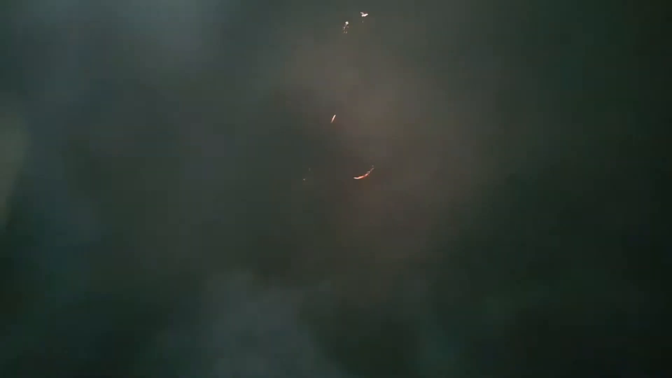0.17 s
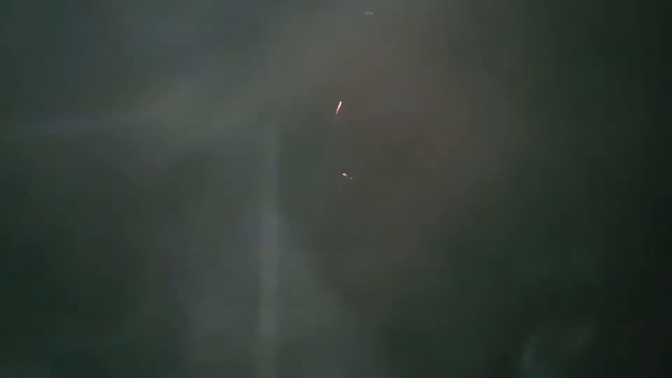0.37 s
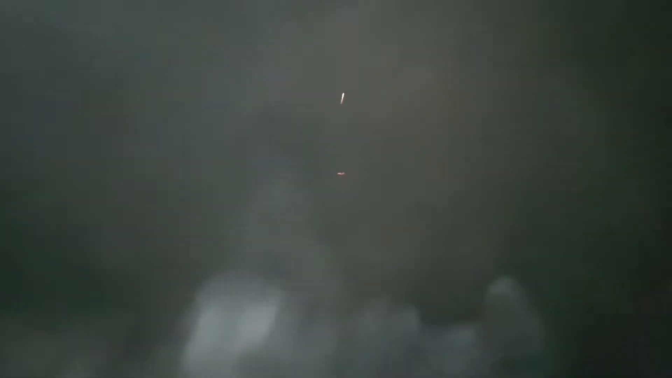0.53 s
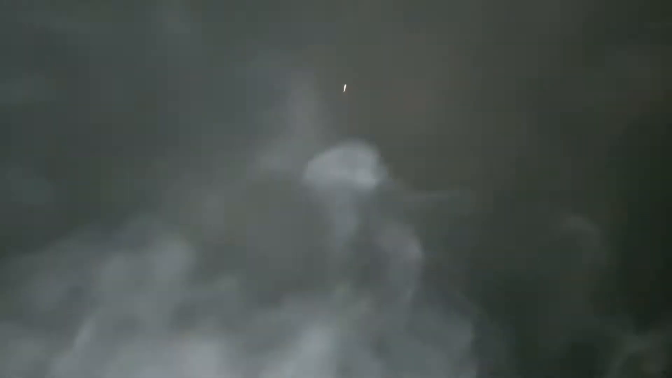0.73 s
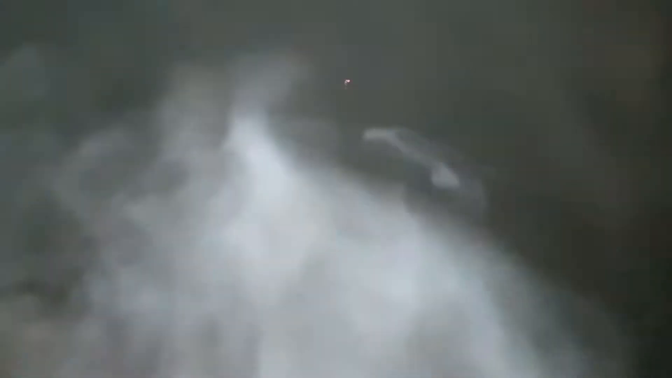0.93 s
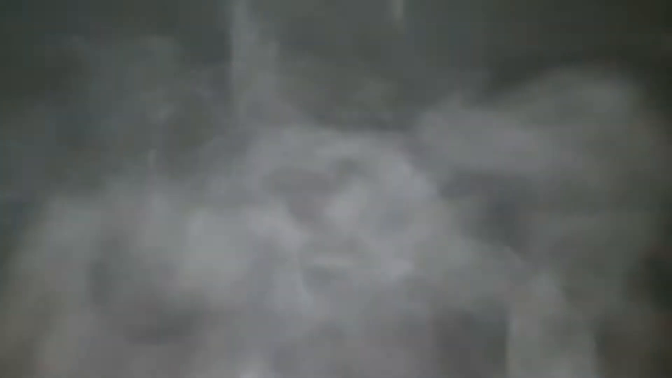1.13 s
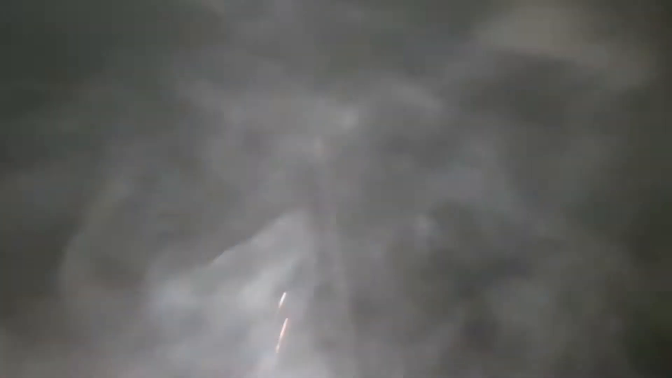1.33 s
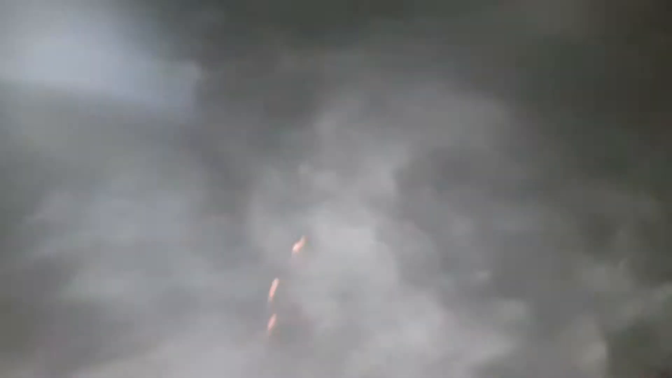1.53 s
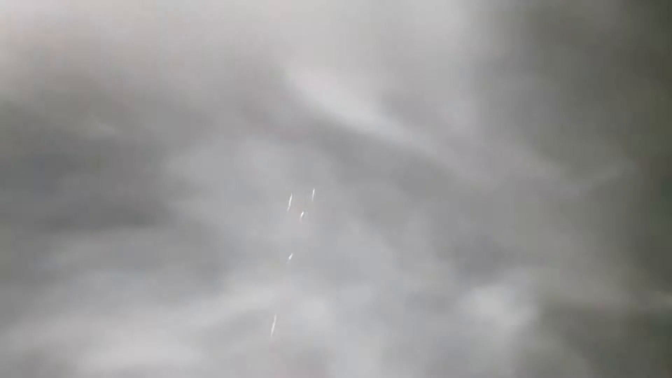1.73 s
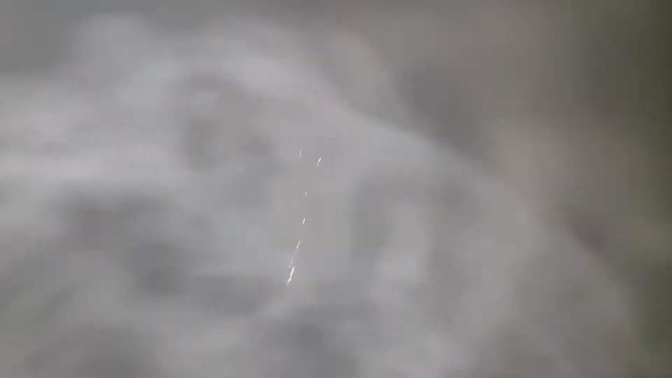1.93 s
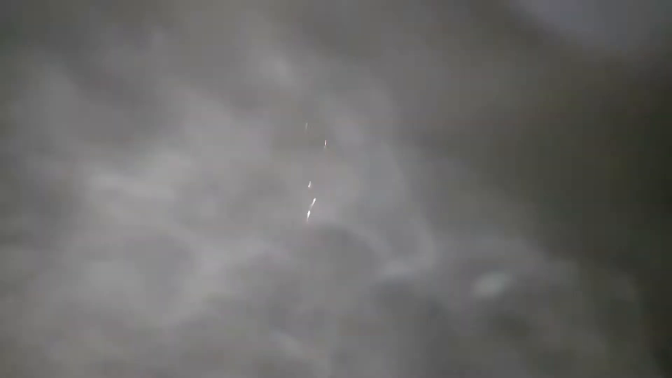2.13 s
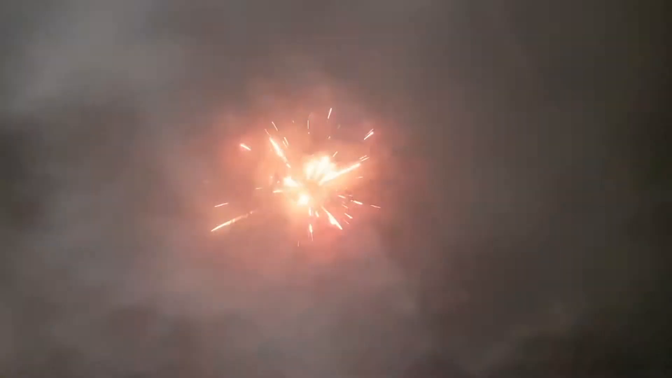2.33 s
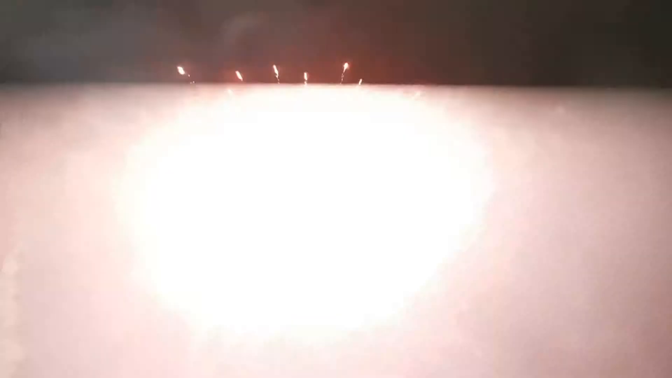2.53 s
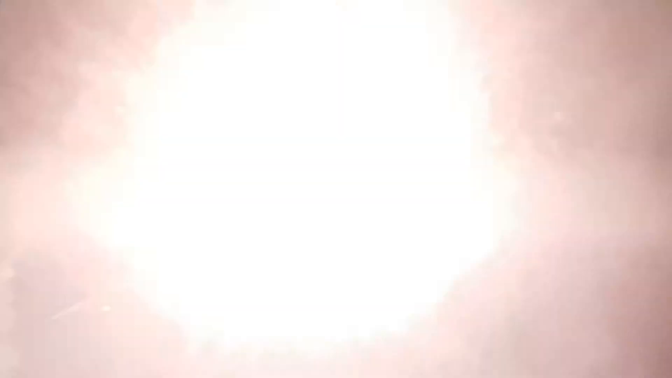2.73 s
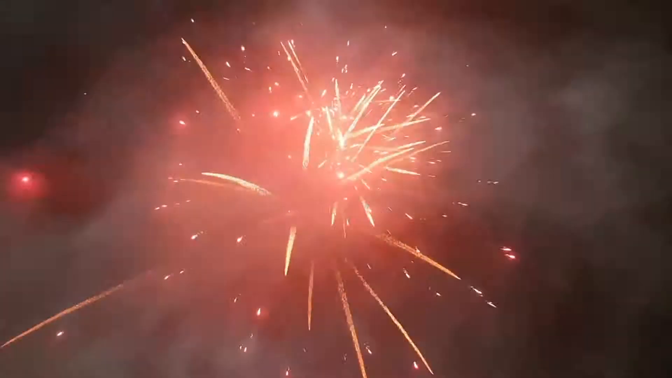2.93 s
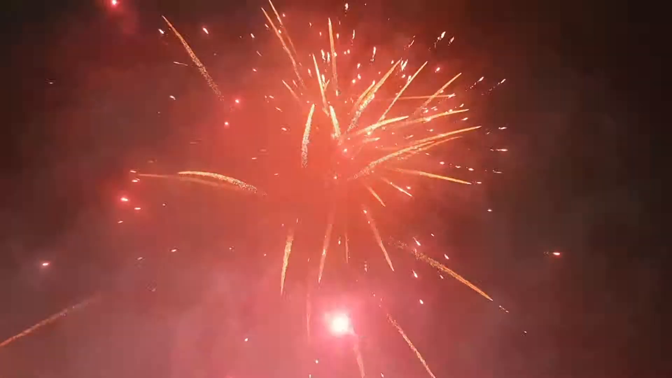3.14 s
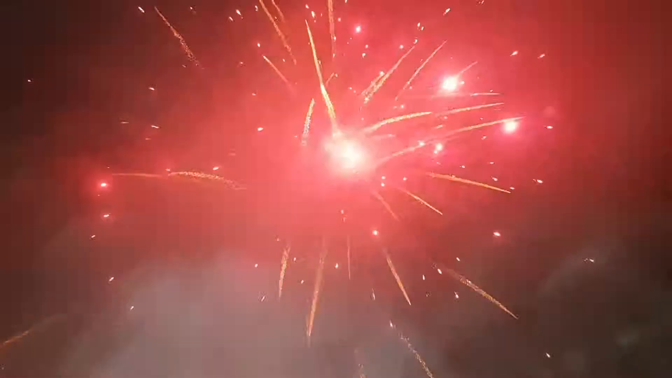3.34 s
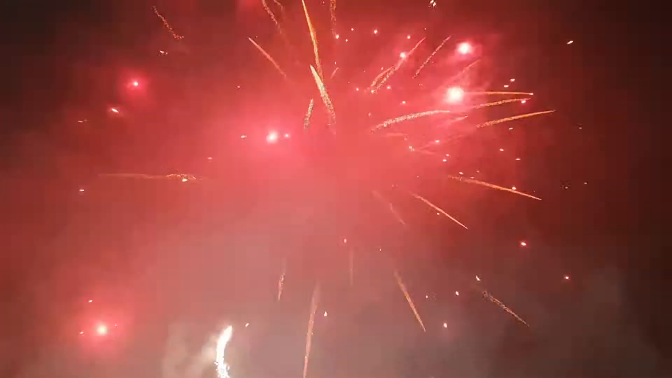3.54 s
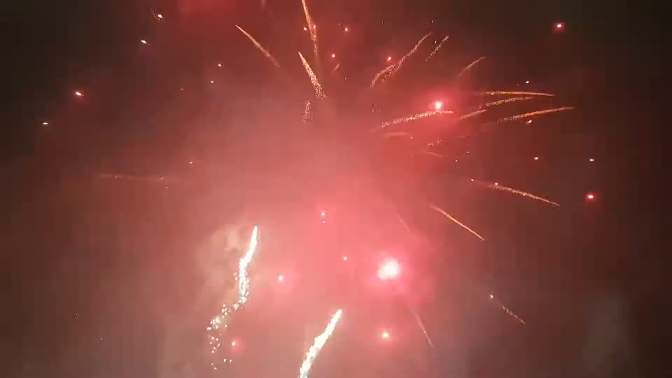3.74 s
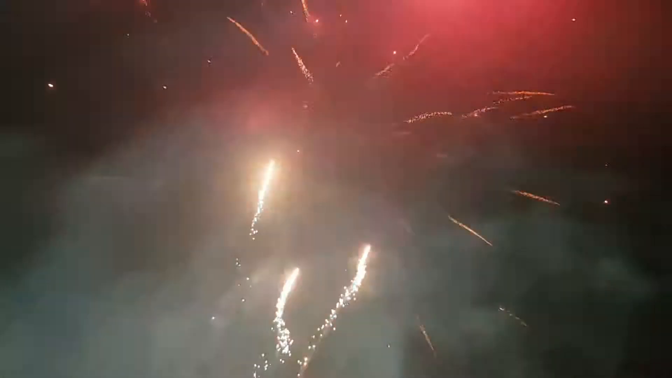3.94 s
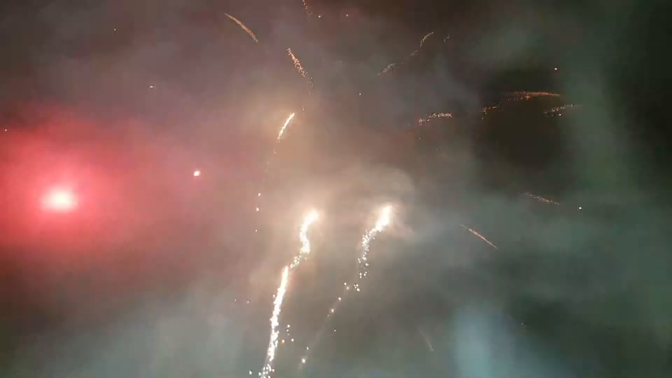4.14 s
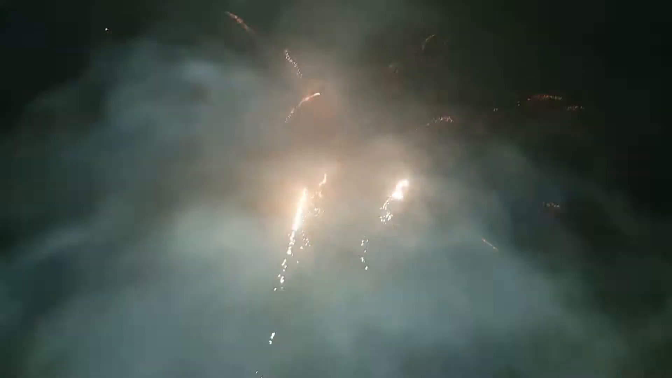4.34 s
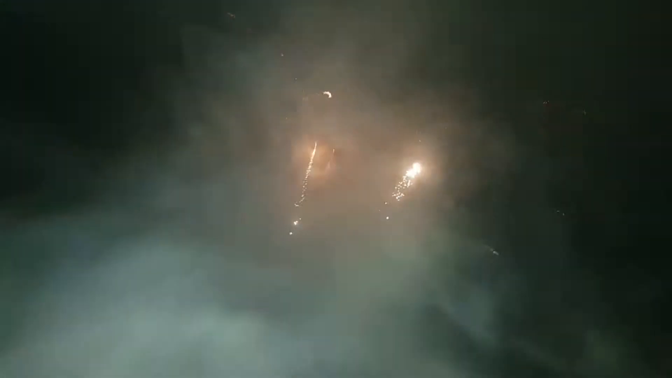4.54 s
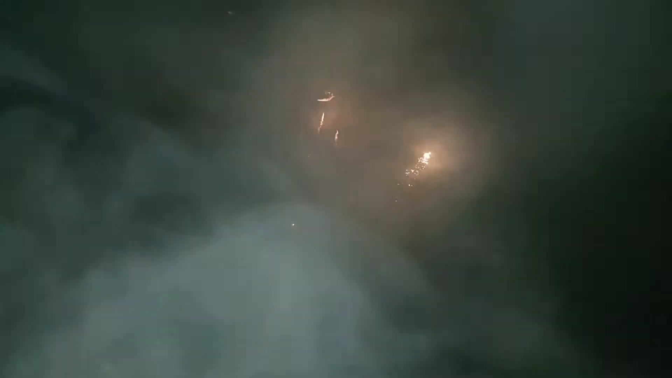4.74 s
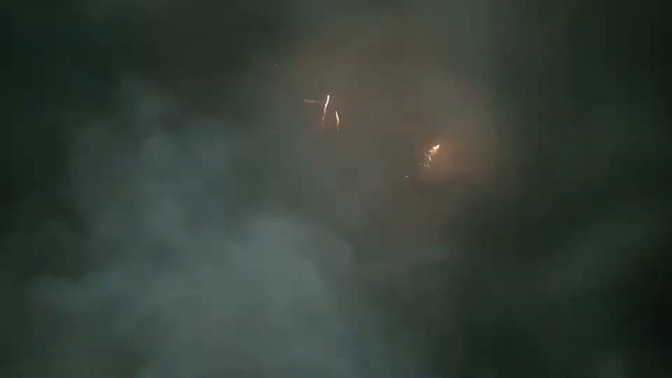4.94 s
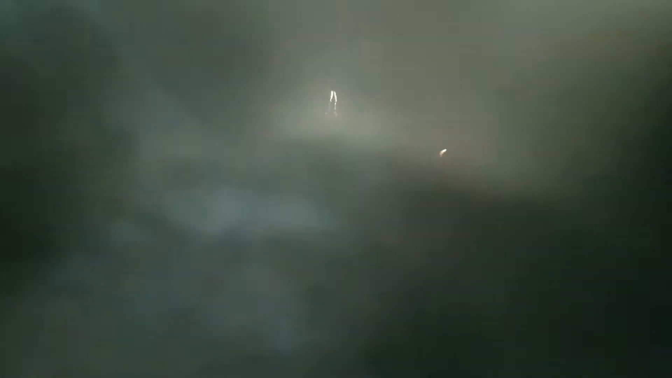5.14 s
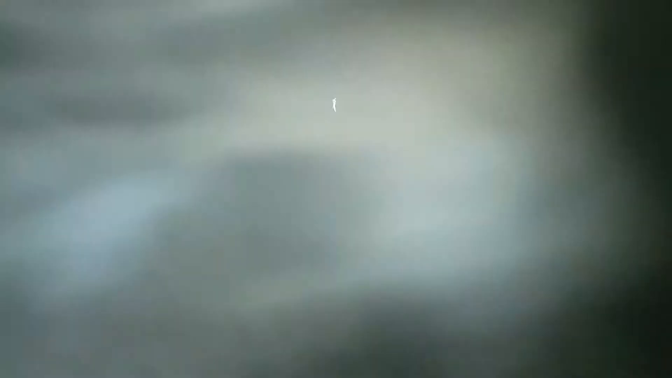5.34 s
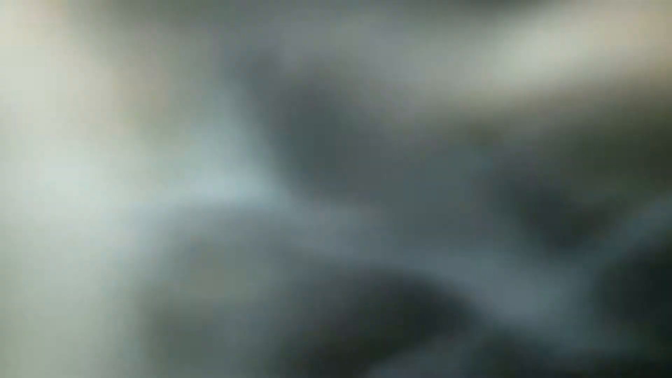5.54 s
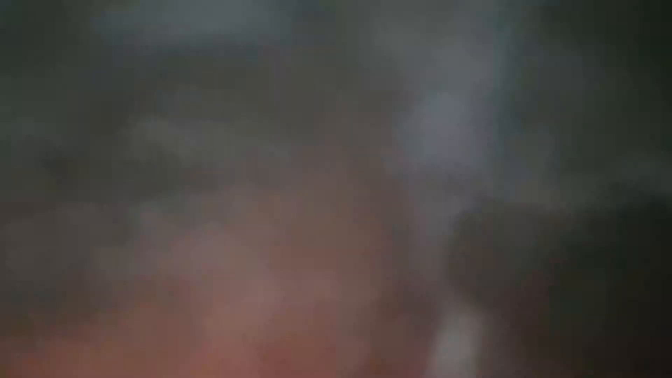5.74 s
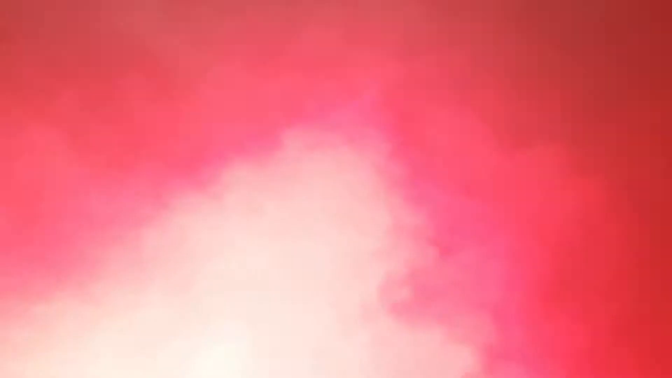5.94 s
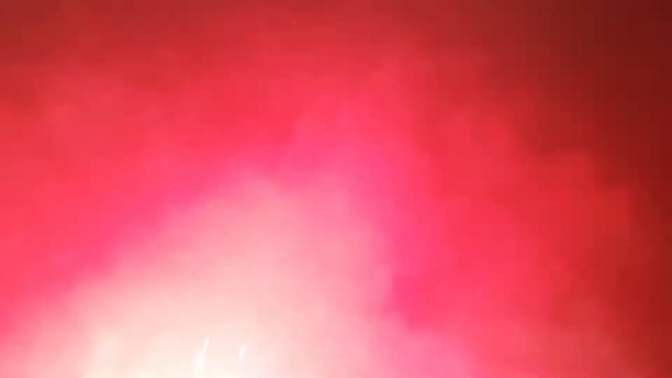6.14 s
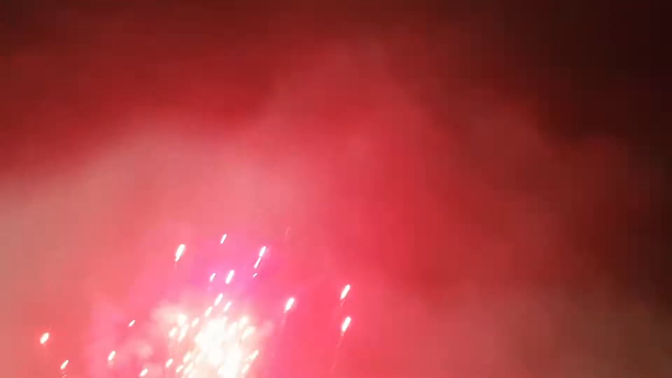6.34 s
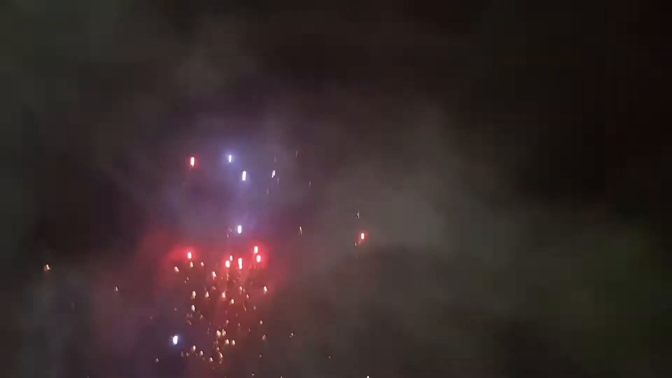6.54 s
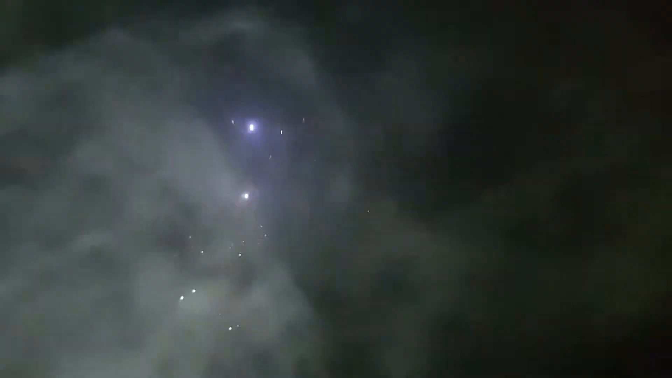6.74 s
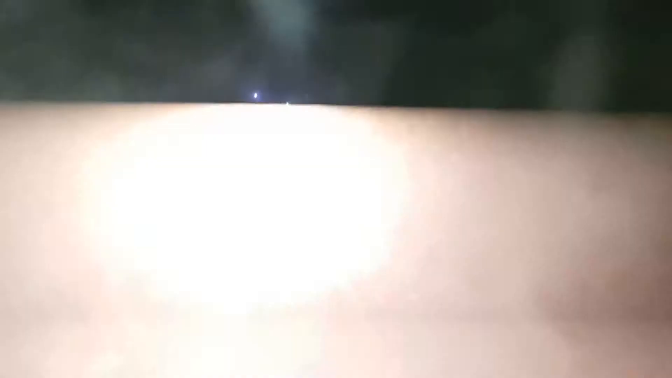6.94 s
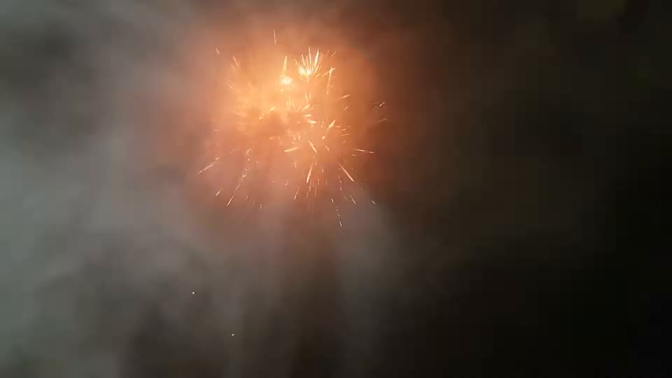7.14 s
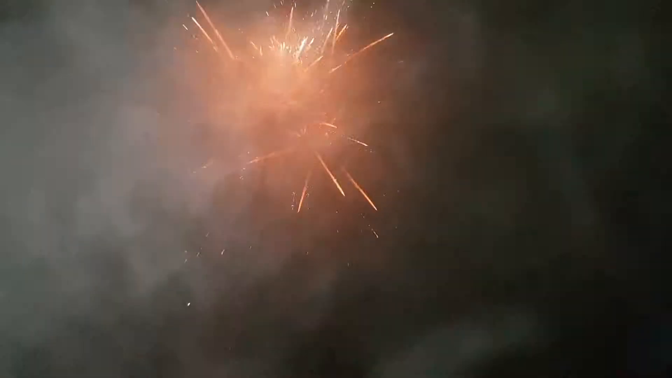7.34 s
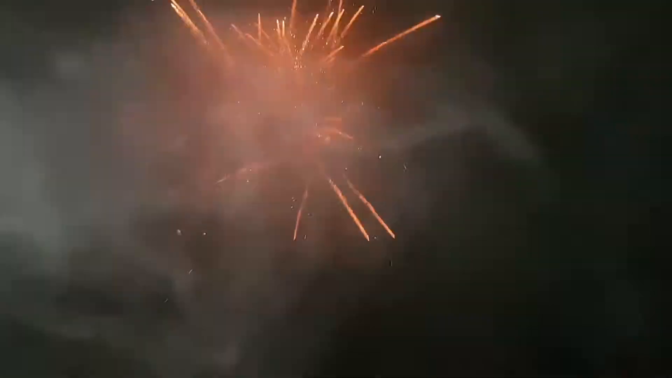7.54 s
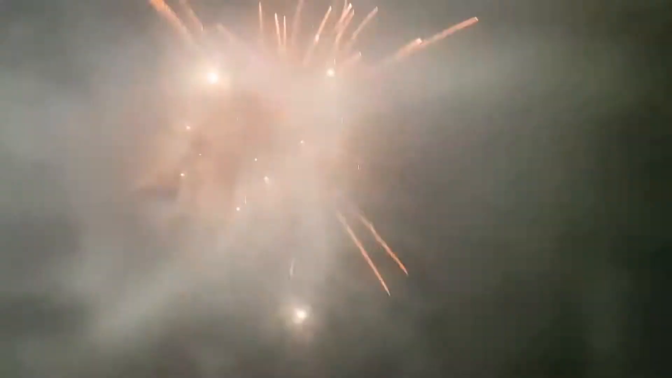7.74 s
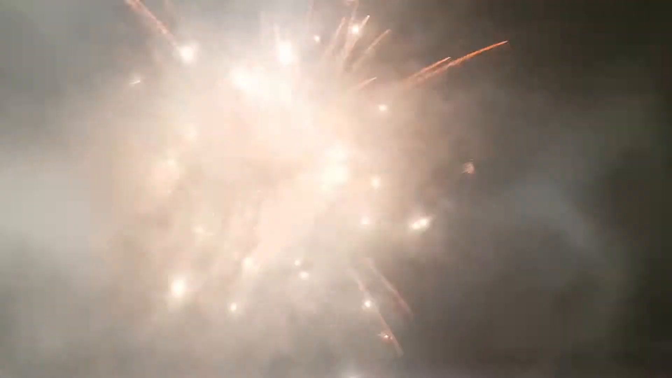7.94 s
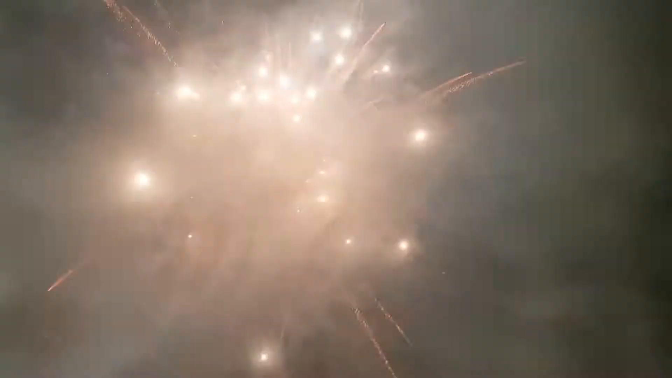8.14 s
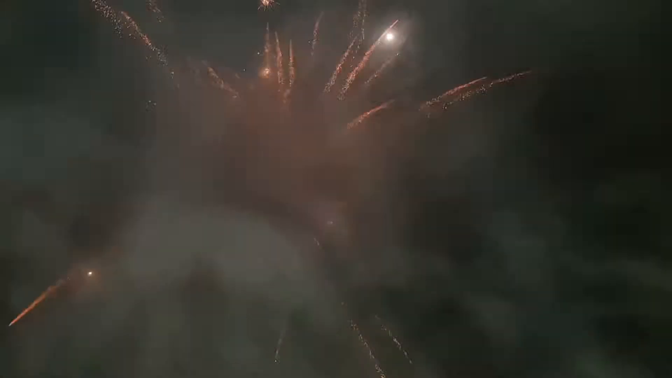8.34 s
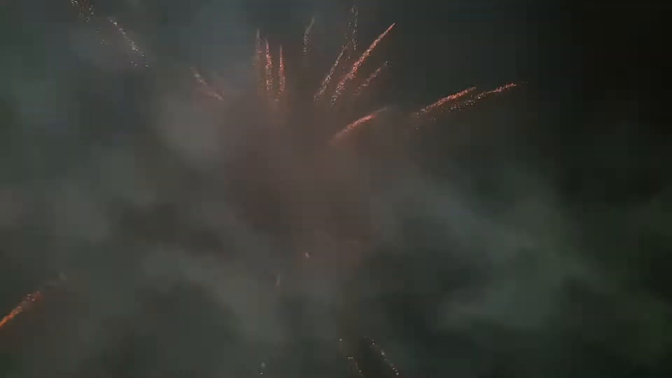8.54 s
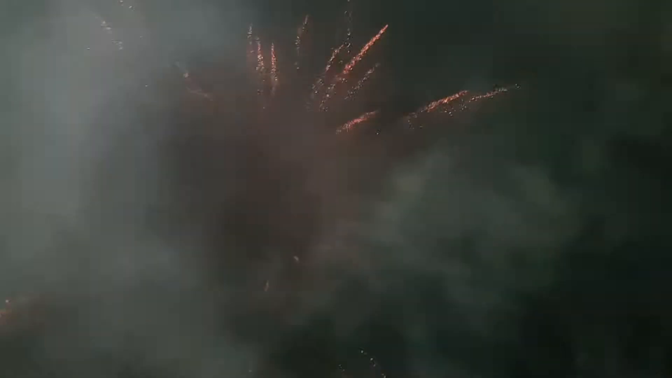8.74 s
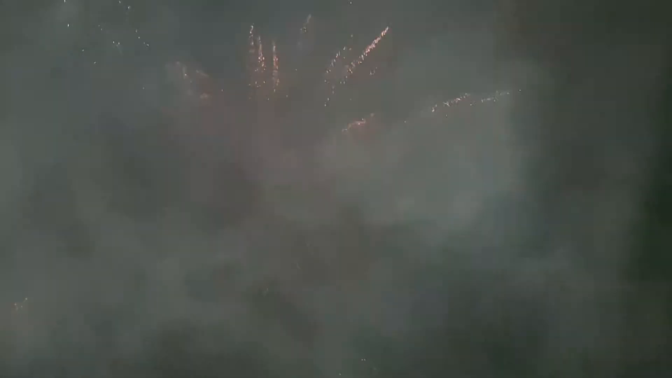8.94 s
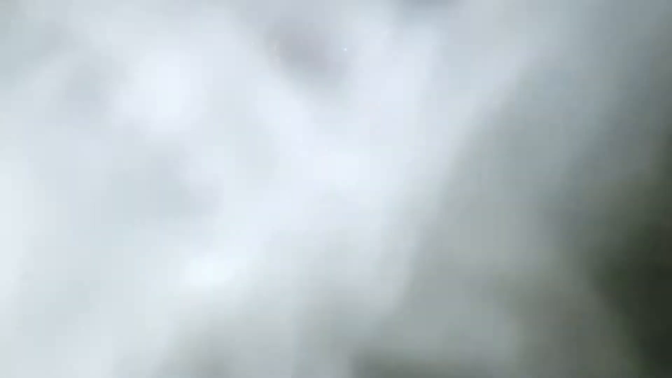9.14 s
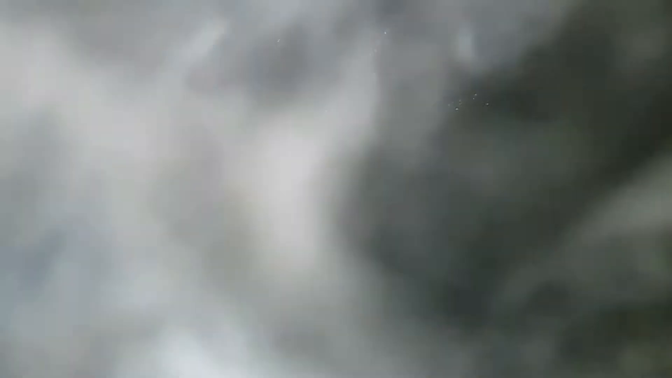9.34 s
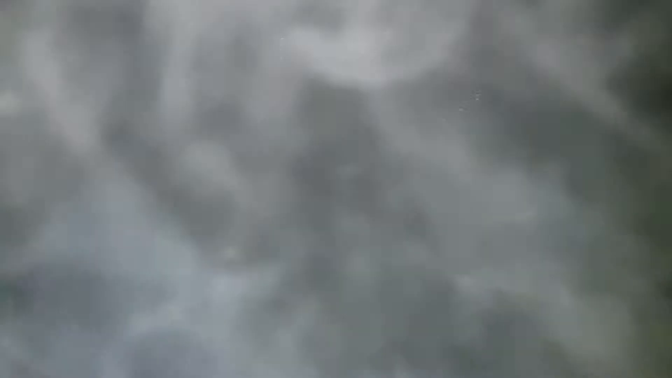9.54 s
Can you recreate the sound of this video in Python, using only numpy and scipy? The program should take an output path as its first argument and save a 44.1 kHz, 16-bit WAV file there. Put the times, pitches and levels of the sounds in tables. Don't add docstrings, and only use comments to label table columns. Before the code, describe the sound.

Wavering rocket whistles open the scene, joined by punchy evenly spaced launches. Shells explode overhead in hard, distorted cracks with ground slaps and a dull tail. Several shrill whistles overlap and fall, ending in a short loud chirp as a rapid burst of launches fires. After a pause come more explosions, a spitting crackle, distant soft pops and hiss, heard close by outdoors through a small overloaded stereo microphone.

```python
import sys
import numpy as np
from scipy import signal
from scipy.io import wavfile

SR = 44100
rng = np.random.default_rng(int(sys.argv[2]) if len(sys.argv) > 2 else 0)


def persist_wave(psi):
    counts = np.round(np.clip(psi, -1, 1) * 32767).astype(np.int16)
    wavfile.write(sys.argv[1], SR, np.atleast_2d(counts).T)


def gain_from_db(level_db):
    decades = np.asarray(level_db, float) / 20
    return 10 ** decades


N = 426888
T = np.arange(N) / SR
GROUND_S = 0.0117
WALL_S = 0.04

# start in seconds, then peak, thump, crack and
# echoes in dB.
SHELL_LIFTS = [(0.8542, -6.5, 12.5, 14, 10), (0.9969, -8, 14, 2.5, 5), (1.0743, -8.5, -6, 7.5, 2.5),
               (1.2185, -6.5, -1, 10, 4.5), (1.3685, -3.5, -11, 6, -1), (1.517, -4.5, -5.5, 8.5, 1.5)]
ROCKET_LIFTS = [(3.1232, -5.5, 7.5, 5.5, 1), (3.1949, -14, 16, 12, 0), (3.3366, -10, -21, 5.5, -2),
                (3.4957, -12, -9, 5.5, -3), (3.6131, -13.5, -7, 1.5, -2.5), (3.7496, -10.5, 2, -7.5, -3)]
SALVO_LIFTS = [(5.6125, -4, 8, 10.5, 5.5), (5.6481, -6.5, 4.5, 4, 7.5), (5.6866, -8, 12, 3, 4),
               (5.733, -5.5, -6, -2, 2), (5.763, -7, -5, 1, 8.5), (5.7855, -6.5, 1.5, 1, 2),
               (5.796, -14, -1, -8, -5), (5.8089, -9.5, 3, 9, -7), (5.8403, -7.5, -7, 7.5, 3.5),
               (5.8794, -11, 8, 12.5, 4)]
# start in seconds, then peak, thump, crack and
# echoes in dB.
FIRST_BURSTS = [(2.3322, 1, -10, 1.5, 1), (2.59, -1.5, 0.5, 4, 2.5), (2.7224, -3, -18, 2, 0.5),
                (2.9196, -3, 3, 1.5, 3), (2.933, -4.5, -14, 2, -17.5), (3.002, -2.5, -19, 3, 0)]
SALVO_BURSTS = [(7.1111, 0.5, -15, -1, 2.5), (7.1359, -4, 9, -7.5, 3.5), (7.18, -3, -13, -11, 4.5),
                (7.257, -3.5, -14, 2, -2.5), (7.2818, -4.5, -14, -6, -2.5), (7.2878, -3, -20, 1, -1)]
LAST_BURSTS = [(7.5855, -2.5, -5, 5, 3.5), (7.8713, -2.5, -22, -20, -3), (8.042, -3.5, -7, -1.5, -1),
               (8.1624, -6.5, 8, -3, -0.5), (8.287, -6.5, 7, -1, 4), (8.673, -2.5, -34, -0.5, -1.5)]
# time in seconds, strong partial in Hz, level in dB.
ALOFT_C = [(0, 2713, -25.5), (.35, 2573, -32), (.55, 2695, -37.5), (.84, 2675, -41.5)]
ROCKET_B = [(3.26, 3640, -24.5), (3.45, 3490, -19), (3.65, 3222, -19.5), (3.8, 3200, -18.5),
            (4.0, 2990, -30), (4.601, 2611, -33), (4.95, 2494, -30.5), (5.25, 2698, -29),
            (5.6, 2964, -40.5)]


def at_hz(points, hz):
    table_hz, values = np.array(points).T
    return np.interp(np.log(hz), np.log(table_hz), values)


def drift(hz, size):
    r = np.exp(-2 * np.pi * hz / SR)
    slow = signal.lfilter([1], [1, -2 * r, r * r], rng.standard_normal(size + 4000))[4000:]
    return slow / np.std(slow)


def cut(x, hz, kind, order=2):
    return signal.sosfilt(signal.butter(order, hz, kind, fs=SR, output="sos"), x)


def clicks(times, gains):
    out = np.full(N, 1e-18)
    np.add.at(out, np.minimum((np.asarray(times) * SR).astype(int), N - 1), gains)
    return out


def fade(train, t60):
    return signal.lfilter([1], [1, -gain_from_db(-60 / (t60 * SR))], train)


def ground_echo(x, db):
    return x + gain_from_db(db) * np.roll(x, int(GROUND_S * SR))


def shock(train, hz, depth):
    u = np.arange(200) / SR * hz
    spike = 1.05 * np.exp(-u / 0.11)
    suction = depth * np.sin(np.pi * np.minimum(u / 0.85, 1)) ** 2
    return signal.oaconvolve(train, spike - suction)[:N]


def night_hiss():
    smoulder_db = 4.5 * np.clip((T - 8.9) / 0.4, 0, 1)
    power = gain_from_db(2 * (-61 + smoulder_db))
    since = T - SALVO_LIFTS[0][0]
    comets_db = -43.5 - 20 * np.abs(since)
    return power + (since > 0) * gain_from_db(2 * comets_db)


def whistle(hz, db, fresh, odd_db, left_db):
    partials_db = [-13.5, -1.5, -4, -18, -13, -25, -28, -38.5, -36.5, -49.5, -45, -47]
    n = len(hz)
    tone = np.zeros(n)
    scream_db = 3.4 * fresh
    tatters = drift(35, n) - 0.3
    wild = 1 + 0.15 * scream_db + 0.9 * np.clip((hz - 2700) / 900, 0, 1)
    waver = wild * (0.0033 * drift(90, n) + 0.003 * drift(14, n))
    phase = 2 * np.pi * np.cumsum(hz / 2 * (1 + waver)) / SR
    for k, partial_db in enumerate(partials_db, 1):
        level_db = partial_db + odd_db * (k % 2) * (1 - 0.66 * fresh)
        level_db = level_db + scream_db * min(max(k - 3, 0), 5)
        if k > 3:
            level_db = level_db + 5 * fresh * np.roll(tatters, 3000 * k)
        audible = hz * k / 2 < 15500
        tone += audible * gain_from_db(level_db) * np.sin(k * phase + rng.uniform(0, 6.2))
    tone *= gain_from_db(db + 4.05 * drift(74, n))
    tone = ground_echo(tone, -5)
    carrier = np.sin(2.25 * phase) + gain_from_db(odd_db - 4) * np.sin(1.1 * phase)
    skirt = gain_from_db(db - 13) * np.array([drift(380, n), drift(380, n)]) * carrier
    pair = np.array([tone, np.roll(tone, rng.integers(1, 5))])
    return 1.135 * (pair + skirt) * gain_from_db([[left_db / 2], [-left_db / 2]])


def whistles():
    # time in seconds, strong partial in Hz, level in dB.
    aloft_a = [(0, 2632, -30), (.3, 2525, -26), (.65, 2443, -26.5), (.87, 2484, -30.5), (1.0, 2486, -37),
               (1.19, 2560, -41), (1.27, 2650, -47)]
    aloft_b = [(0, 2440, -24), (.3, 2472, -29.5), (.5, 2555, -30.5), (.72, 2583, -26.5), (.84, 2604, -23.5),
               (.96, 2630, -31)]
    # time in seconds, strong partial in Hz, level in dB.
    rocket_a = [(3.22, 3480, -23), (3.55, 3100, -24), (3.85, 2820, -28), (4.05, 2715, -28),
                (4.45, 2600, -26), (4.72, 2330, -25), (5.0, 2270, -26), (5.2, 2400, -34)]
    rocket_c = [(3.56, 3430, -20), (3.75, 3146, -24.5), (4.0, 3094, -23.5), (4.3, 2816, -24.5),
                (4.8, 2426, -27.5), (5.15, 2433, -22), (5.33, 2473, -22), (5.52, 2780, -29.5)]
    rocket_d = [(3.77, 3400, -25), (4.05, 3050, -24), (4.3, 2810, -23), (4.45, 2710, -26), (4.7, 2610, -28),
                (5.0, 2450, -26), (5.3, 2410, -26), (5.5, 2330, -27)]
    last_gasp = [(5.44, 2434, -38), (5.47, 2370, -27), (5.51, 2062, -23), (5.55, 2110, -19),
                 (5.58, 2484, -21), (5.61, 2320, -7.5)]
    # course, lit in earshot 0-1, odd partials in dB, left over right in dB.
    tubes = [(aloft_a, 0, -3.5, 3.9), (aloft_b, 0, -11, 2.2), (ALOFT_C, 0, -8, 6.1),
             (rocket_a, 1, -15, 4), (ROCKET_B, 0.3, -13.5, 6.3), (rocket_c, 0.15, -15, 2.7),
             (rocket_d, 0.96, -3.3, 2.8), (last_gasp, 0, -25, 1.5)]
    out = np.zeros((2, N))
    for course, lit, odd_db, left_db in tubes:
        a, b = int(course[0][0] * SR), int(course[-1][0] * SR)
        s, course_hz, course_db = np.transpose(course)
        age = T[a:b] - s[0]
        catch = lit * np.exp(-age / 0.035)
        sway_hz = lit * 200 * np.exp(-age / 0.22) * np.sin(2 * np.pi * 16.5 * age)
        burnout_db = -15 * np.maximum(1 - age[::-1] / 0.052, 0)
        hz = np.interp(T[a:b], s, course_hz) + 800 * catch - sway_hz
        db = np.interp(T[a:b], s, course_db) - 10 * catch + burnout_db
        fresh = (lit > 0) * np.exp(-age / 0.33)
        out[:, a:b] += whistle(hz, db, fresh, odd_db, left_db)
    return out


def jets():
    lights_s, swell_s, roar_db, cruise_db = 0.046, 0.15, -40.5, -49.5
    power = np.zeros(N)
    for course in (ALOFT_C, ROCKET_B):
        power += gain_from_db(2 * cruise_db) * (T >= course[0][0]) * (T < course[-1][0])
    for s, *_ in ROCKET_LIFTS[1:]:
        age = np.maximum(T - s - lights_s, 0) / swell_s
        power += gain_from_db(2 * roar_db) * (age * np.exp(1 - age)) ** 2
    return power


def shots():
    s, peak, thump, crack = np.array(SHELL_LIFTS + ROCKET_LIFTS + SALVO_LIFTS).T[:4]
    bs, bpeak, bthump, bcrack = np.array(FIRST_BURSTS + SALVO_BURSTS + LAST_BURSTS).T[:4]
    lifts = clicks(s, gain_from_db(peak + 2.5))
    bursts = clicks(bs, gain_from_db(bpeak + 2.5)) + clicks(bs + GROUND_S, gain_from_db(bpeak + 3))
    fronts = shock(lifts, hz=460, depth=0.7) + shock(bursts, hz=440, depth=0.85)
    fronts = cut(fronts, 170, "high", order=1)
    snap = np.cos(2 * np.pi * 3000 * T[:150]) * np.exp(-T[:150] / 0.0005)
    fronts += gain_from_db(-8) * signal.oaconvolve(lifts + bursts, snap)[:N]
    fronts += gain_from_db(-14) * np.roll(cut(fronts, 1520, "low"), int(WALL_S * SR))
    fronts += far_pops()

    t = np.arange(2200) / SR
    push = np.sin(2 * np.pi * 95 * (t - 0.0016)) * np.exp(-t / 0.0034) * (1 - np.exp(-t / 0.00079))
    swing = np.sin(2 * np.pi * 85 * t) * np.exp(-t / 0.003)
    times, push_db = np.r_[s, bs], np.r_[peak + thump, bpeak + bthump]
    fronts += signal.oaconvolve(clicks(times, gain_from_db(push_db - 6)), push)[:N]
    tilt = clicks(times, gain_from_db(push_db - 5.5) * rng.choice([-1, 1], len(times)))

    strikes = clicks(times, gain_from_db(np.r_[peak + crack, bpeak + bcrack]))
    strikes += clicks(bs + GROUND_S, gain_from_db(bpeak + bcrack - 5))
    gate = gain_from_db(-6) * fade(strikes, 0.006) + gain_from_db(-19) * fade(strikes, 0.035)
    noise = cut(rng.standard_normal((2, N)), 1000, "high", order=1)
    ragged = noise * gate * gain_from_db([[1.5], [-2.5]])
    left = fronts + signal.oaconvolve(tilt, swing)[:N]
    right = np.roll(fronts, 4)
    return np.array([left, right]) + ragged


def surroundings():
    # frequency in Hz, level in dB per Hz.
    near_colour = [(18, -52), (30, -44), (111, -2.5), (208, -1.5), (479, -6.5), (561, -7), (691, -14),
                   (1080, -20), (2300, -16), (2550, -15.5), (2990, -17), (4090, -20), (8280, -26),
                   (12300, -33), (15500, -24.5)]
    far_colour = [(18, -48), (30, -22), (77, -7), (237, 0.5), (332, -2), (505, -1), (945, -10),
                  (1820, -7.5), (2180, -12.5), (2690, -10), (8280, -23), (13300, -30.5), (15500, -43)]
    jet_colour = [(120, -76.5), (300, -53), (600, -25), (900, -50), (1500, -22.5), (2200, -20.5),
                  (3300, -6), (4500, -11.5), (6000, -25), (8500, -13), (11000, -34.5), (15500, -24)]
    hiss_colour = [(18, -58), (30, -35.5), (75, -9), (197, -6.5), (237, -7.5), (292, -5.5), (432, -6.5),
                   (479, -13.5), (970, -36), (1510, -18), (5040, -24), (6540, -12.5), (8500, -29),
                   (10500, -21.5), (15500, -18.5)]
    # frequency in Hz, time to fall 60 dB in seconds.
    near_t60 = [(40, 0.17), (200, 0.34), (700, 0.38), (3000, 0.32), (12000, 0.46)]
    far_t60 = [(40, 0.8), (250, 1.26), (1000, 1.44), (4000, 1.17), (12000, 0.1)]
    # frequency in Hz, left-right likeness from 0 to 1.
    likeness = [(40, 0.83), (150, 1), (400, 0.68), (1000, 0.06), (3000, 0.19), (12000, 0.017)]
    # frequency in Hz, left over right in dB.
    left_over_right = [(40, 1), (300, 0.9), (1500, 5), (4000, 1.5), (8000, 5), (13000, 0.5)]
    # volley, far over near echoes in dB.
    far_answer = [(SHELL_LIFTS, -6), (ROCKET_LIFTS, -18.5), (SALVO_LIFTS, -4.5),
                  (FIRST_BURSTS, 0.89), (SALVO_BURSTS, 3.1), (LAST_BURSTS, 5.3)]
    blasts = np.array([(*row, row[4] + far_db) for volley, far_db in far_answer for row in volley])
    s, peak, _, _, near_db, far_db = blasts.T
    near = clicks(s + 0.003, gain_from_db(2 * (peak + near_db)))
    near += gain_from_db(-28) * np.roll(near, int(WALL_S * SR))
    far = clicks(s + 0.017, gain_from_db(2 * (peak + far_db)))

    step = 32
    near, far = [np.add.reduceat(v, np.arange(0, N, step)) for v in (near, far)]
    slow = T[::step]
    jet, hiss = jets()[::step], night_hiss()[::step]
    smear = gain_from_db(2 * stars()[1])[::step]
    climb = np.maximum(jet * gain_from_db(77), 0.05)

    def die(v, t60):
        return signal.lfilter([1], [1, -gain_from_db(-120 * step / SR / t60)], v)

    def rise(v, seconds):
        share = step / SR / seconds
        return signal.lfilter([share], [1, share - 1], v)

    out, white = np.zeros((2, N)), rng.standard_normal((2, 2, N))
    edges = np.geomspace(30, 15900, 22)
    for k, (low, high) in enumerate(zip(edges, edges[1:])):
        hz = np.sqrt(low * high)
        near_tail = rise(die(near, at_hz(near_t60, hz)), 0.00058 + 0.81 / hz)
        far_tail = rise(die(far, at_hz(far_t60, hz)), 0.13)
        roar = jet * climb ** (0.42 * np.log2(hz / 4000))
        power = gain_from_db(2 * (at_hz(near_colour, hz) + 3)) * near_tail
        power += gain_from_db(2 * (at_hz(far_colour, hz) - 15.5)) * far_tail
        power += gain_from_db(2 * (at_hz(jet_colour, hz) + 31.5)) * roar
        power += gain_from_db(2 * (1.5 - 3.5 * abs(np.log2(hz / 3400)))) * smear
        power += gain_from_db(2 * (at_hz(hiss_colour, hz) + 26)) * hiss
        lumps = gain_from_db(1.3 * drift(2500, len(slow)))
        envelope = np.interp(T, slow, np.sqrt(power) * lumps)
        mid, side = cut(white[k % 2], [low, high], "band")
        alike = np.clip(at_hz(likeness, hz), 0, 1)
        pair = np.sqrt((1 + alike) / 2) * mid + np.sqrt((1 - alike) / 2) * side * [[1], [-1]]
        left_db = at_hz(left_over_right, hz) / 2
        out += envelope * pair * gain_from_db([[left_db], [-left_db]])
    return out


def far_pops():
    # start in seconds, peak in dB, low-pass cut in Hz.
    pops = [(1.776, -36, 3000), (1.798, -29, 3000), (7.617, 2, 705), (9.099, -19, 600), (9.176, -22, 700),
            (9.184, -18, 700), (9.672, -25, 3000)]
    out = np.zeros(N)
    size = 900
    blast = shock(np.eye(1, size)[0], hz=415, depth=0.72)[:size]
    for at, db, cut_hz in pops:
        i = int(at * SR)
        dull = cut(cut(blast, cut_hz, "low"), cut_hz / 5, "high")
        out[i:i + size] += gain_from_db(db) * dull[:N - i]
    return out


def fragments():
    # start and end in seconds, start and end pitch
    # in Hz, level in dB.
    spins = [(2.43, 2.508, 1950, 1455, -18), (2.693, 2.749, 2110, 1840, -19),
             (2.828, 2.88, 1950, 1610, -26), (5.566, 5.606, 1243, 1213, -19)]
    out = np.zeros(N)
    for start, end, hz0, hz1, db in spins:
        a, b = int(start * SR), int(end * SR)
        u = np.linspace(0, 1, b - a)
        phase = 2 * np.pi * np.cumsum(hz1 + (hz0 - hz1) * (1 - u) ** 1.2) / SR
        tone = np.sin(phase) + 0.11 * np.sin(2 * phase) + 0.05 * np.sin(3 * phase)
        out[a:b] += gain_from_db(db - 10 * (1.5 - u)) * np.minimum(1, 30 * (1 - u)) * tone
    return out


def stars():
    away = np.abs(T - 8.219)
    lit = (T > 7.62) & (T < 8.67)
    rate = lit * (130 + 2400 * np.exp(-0.5 * (away / 0.16) ** 2))
    return rate, np.where(lit, -25.5 - 124 * away ** 2.48, -120.0)


def crackle():
    # start in seconds, peak in dB.
    last_pops = [(8.5241, -29), (8.5508, 0.5), (8.5615, -19), (8.576, -17), (8.5777, 3.5), (8.5835, -12),
                 (8.62, -5)]
    rate, level_db = stars()
    born = rng.random(N) < rate / SR
    sizes = gain_from_db(3.43 * np.minimum(rng.exponential(1, N), 4))
    last_s, last_db = np.array(last_pops).T
    pops = born * sizes * gain_from_db(level_db + 14.5) + clicks(last_s, gain_from_db(last_db))
    pops = ground_echo(pops, -5.5)
    pops = cut(pops, 3600, "low", order=1)
    side_db = rng.uniform(-3, 3, N) + 1.5
    left = shock(pops * gain_from_db(side_db), hz=3360, depth=0.49)
    right = shock(pops * gain_from_db(-side_db), hz=3200, depth=0.44)
    return np.array([left, np.roll(right, 5)])


def scene():
    return whistles() + shots() + surroundings() + fragments() + crackle()


def roll_off(x):
    return signal.sosfilt(signal.butter(12, 16500, fs=SR, output="sos"), x)


def record(dry):
    band_limit = signal.cheby2(10, 50, 16300, fs=SR, output="sos")
    x = signal.sosfilt(band_limit, cut(dry, 35, "high"))
    x = x - 0.56 * cut(x, [7800, 9600], "band", order=1)
    x = x / (1 + np.abs(x / 0.99) ** 6) ** (1 / 6)
    return roll_off(x)


dry = scene()
out = record(dry)
persist_wave(out)
```